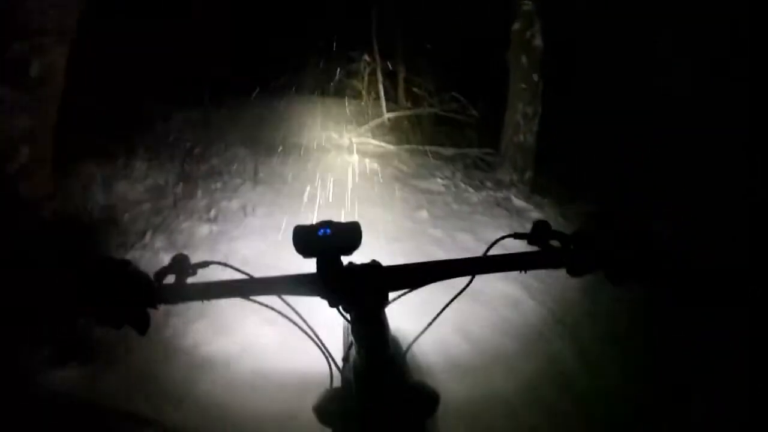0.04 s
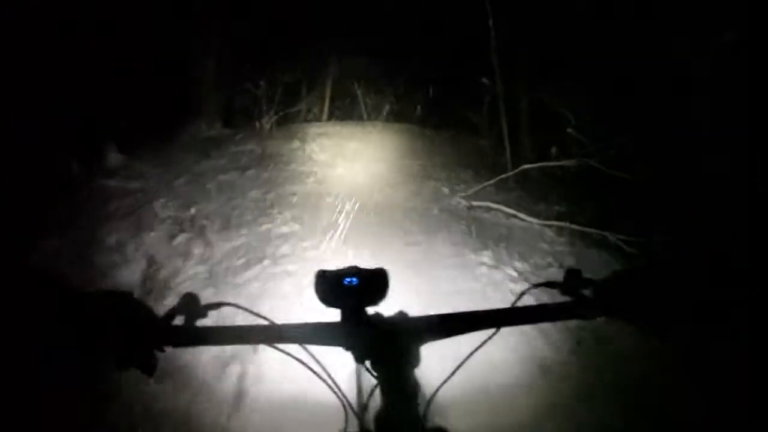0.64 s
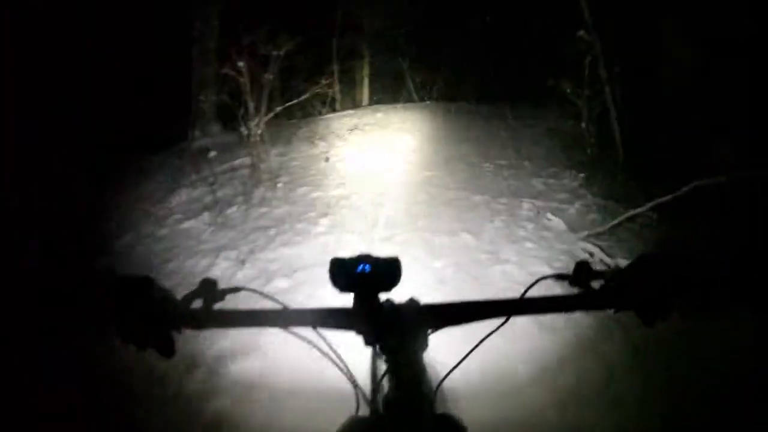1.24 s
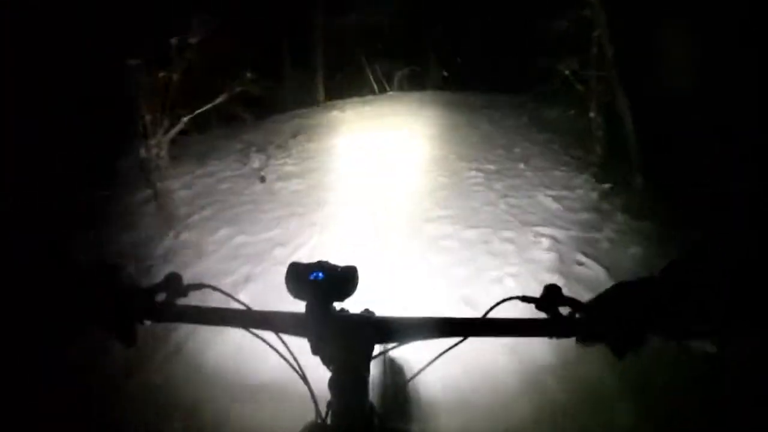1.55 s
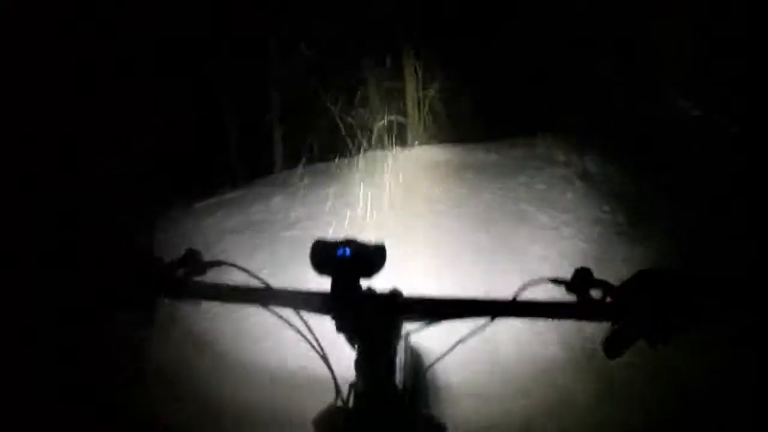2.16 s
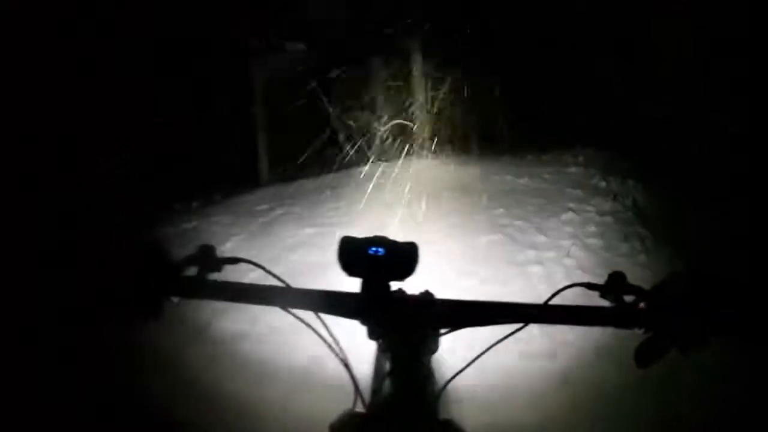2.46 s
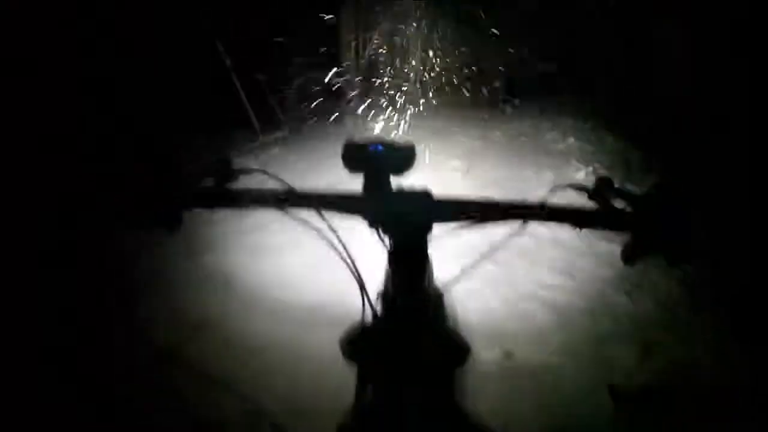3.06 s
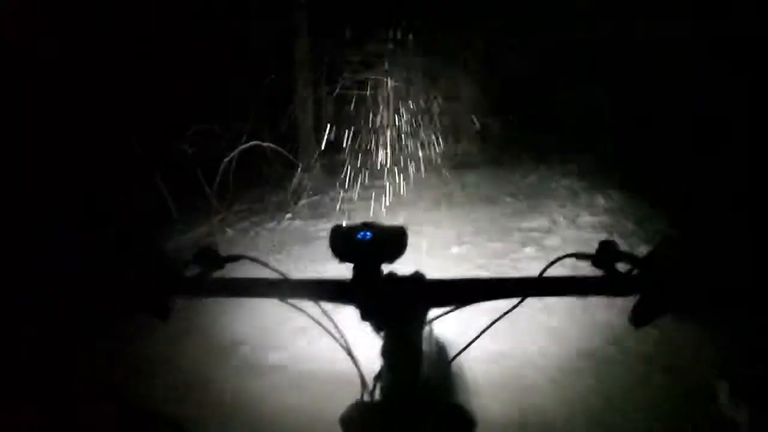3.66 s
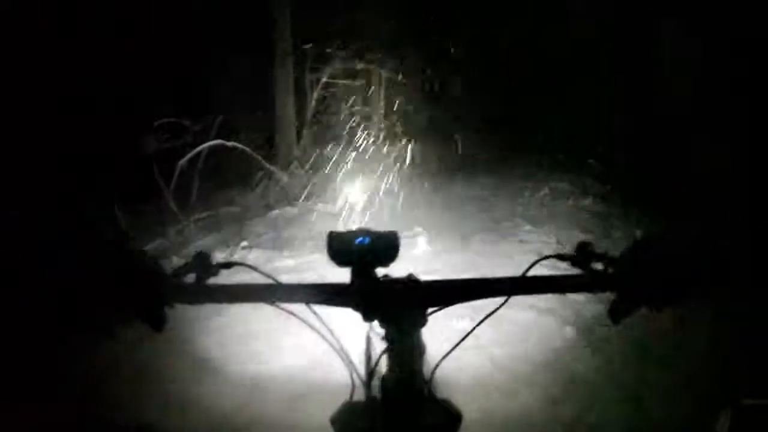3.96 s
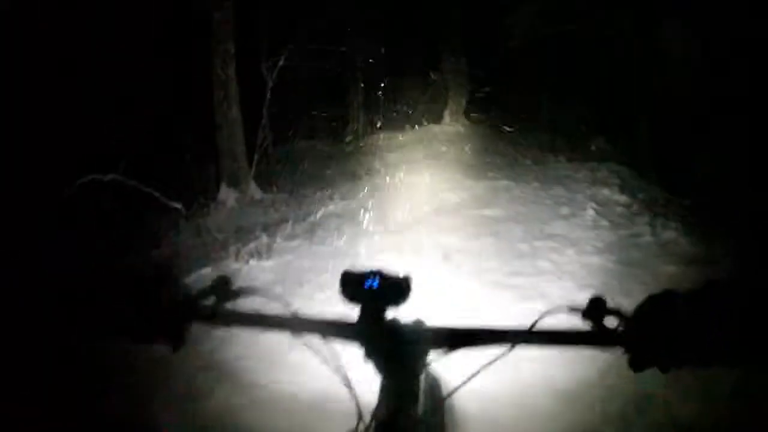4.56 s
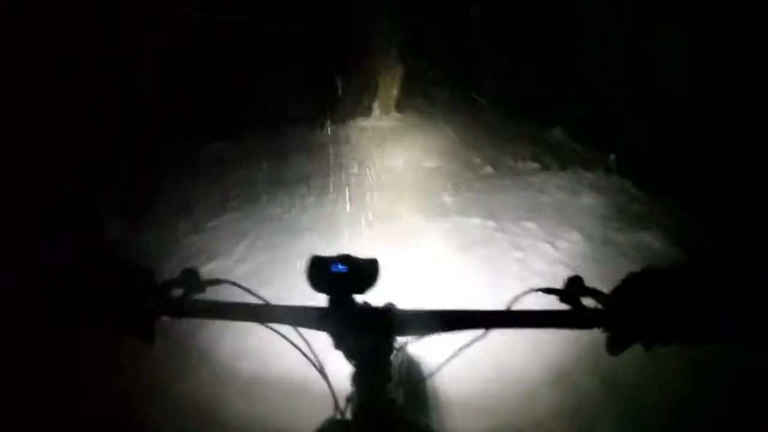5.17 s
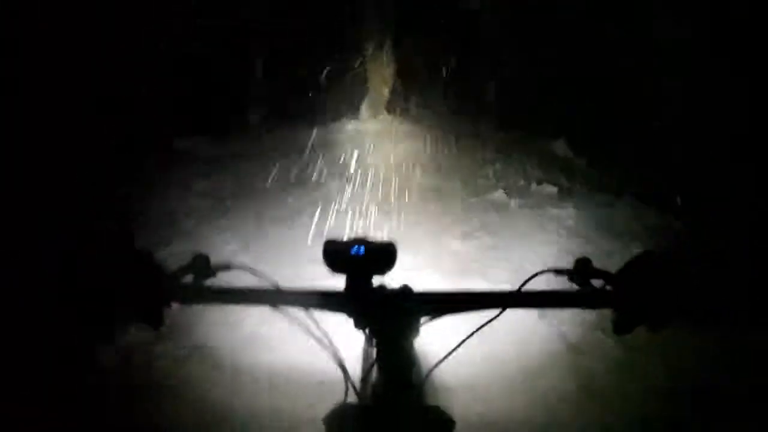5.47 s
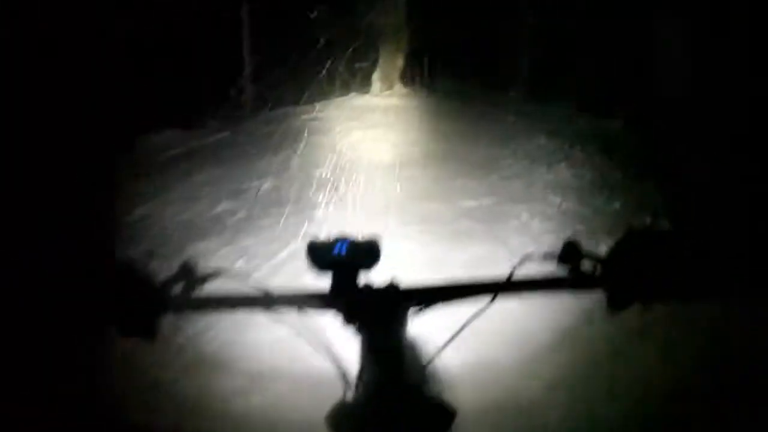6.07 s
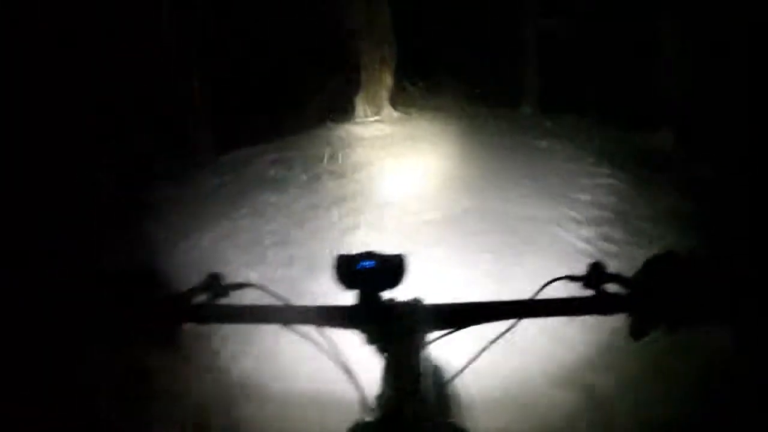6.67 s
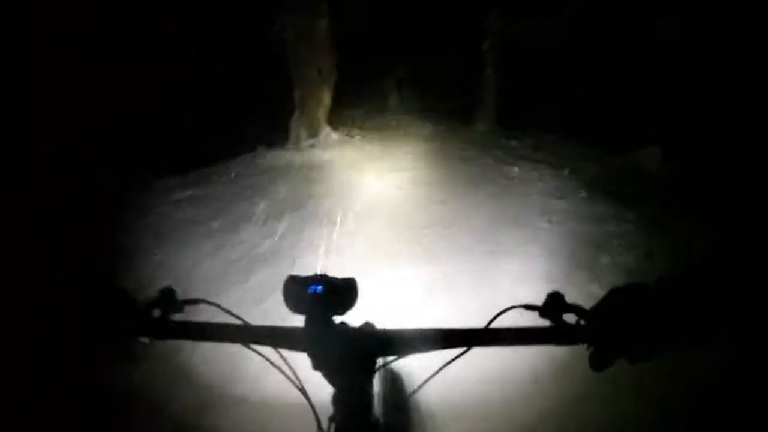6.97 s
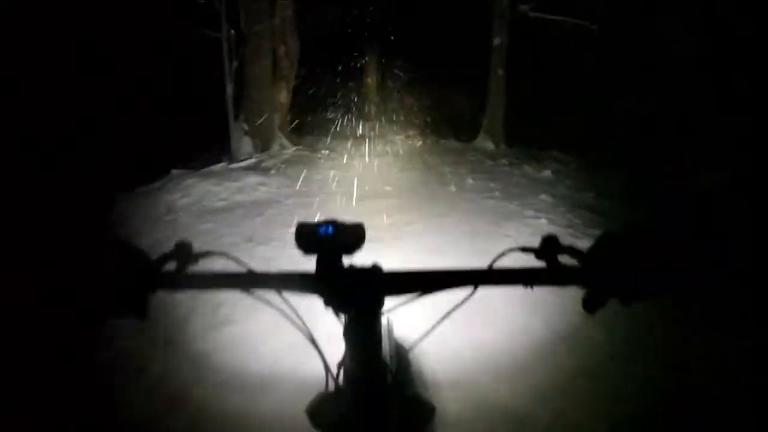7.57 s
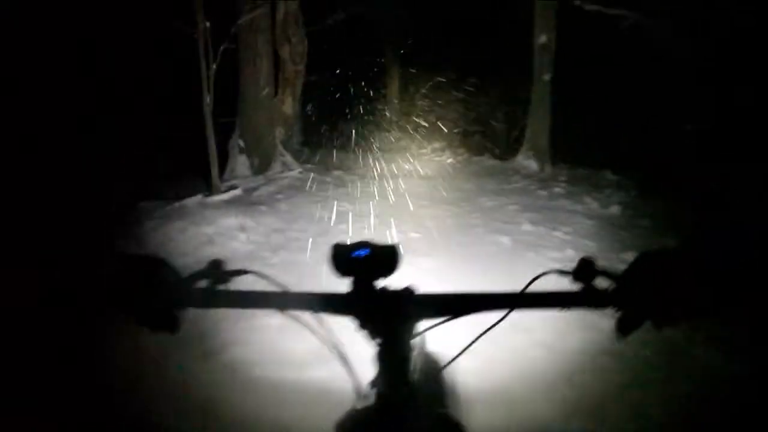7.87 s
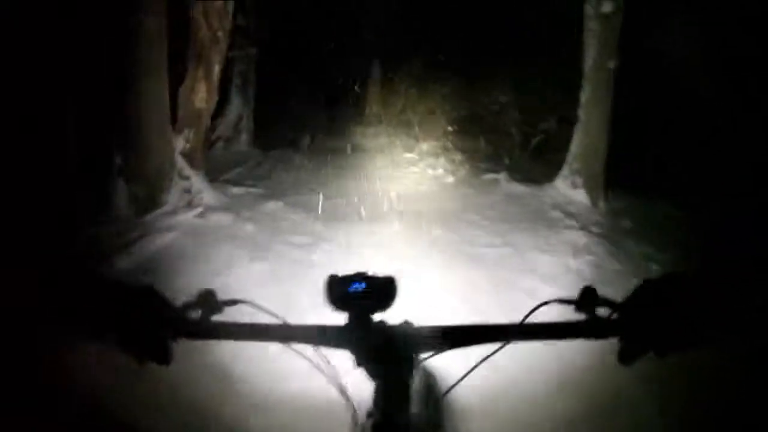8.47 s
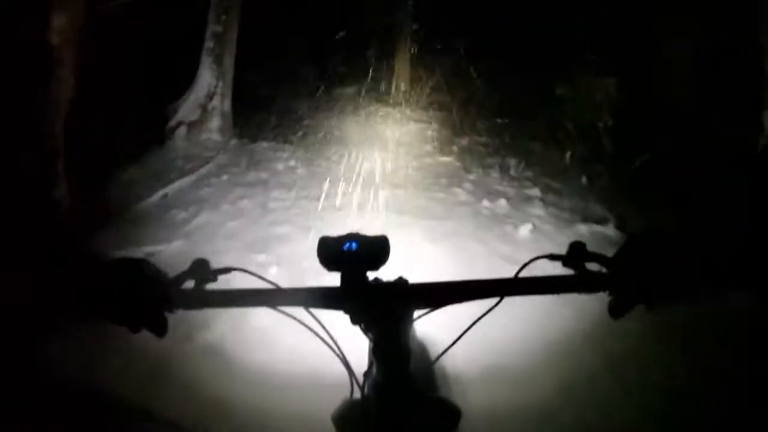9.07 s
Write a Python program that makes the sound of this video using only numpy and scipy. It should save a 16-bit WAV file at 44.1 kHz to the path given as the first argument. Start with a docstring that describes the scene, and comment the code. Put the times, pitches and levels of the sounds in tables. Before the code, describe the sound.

A mountain bike rumbles and crunches over packed snow, with bumps thudding and loose parts clacking sharply right at the microphone.

```python
"""Mountain bike on packed snow.

On the trail, from a cased camera worn by the rider, the tyres just below. They rumble and crunch,
going light before each bump and loading up after it. Bumps thud through the mount; loose parts knock
and clack against it, right at the microphone. The ringing plastic housing colours the snow and the
contacts, and the hardest clacks overload the microphone."""
import sys
import numpy as np
from scipy import signal
from scipy.fft import rfft, irfft
from scipy.io import wavfile

SR = 44100
rng = np.random.default_rng(int(sys.argv[2]) if len(sys.argv) > 2 else 0)


def generate_wav(sig):
    """Save sig (samples, or channels by samples) to the path in sys.argv[1] as 16-bit PCM at SR."""
    pcm = np.round(np.clip(np.atleast_2d(sig).T, -1, 1) * 32767).astype(np.int16)
    wavfile.write(sys.argv[1], SR, pcm)


N = 411012


def gain_of(db):
    """Decibels to amplitude."""
    return 10 ** (np.asarray(db) / 20)


def unit_rms(x):
    """Scales to rms 1."""
    return x / np.sqrt(np.mean(x ** 2) + 1e-20)


def add(mix, s, sound, db):
    """Mixes in a short sound at time s, with the energy of 10 ms at rms level db."""
    sound = gain_of(db) * sound / np.sqrt(np.sum(sound ** 2) / (SR / 100) + 1e-20)
    part = mix[max(round(s * SR), 0):][:len(sound)]
    part += sound[:len(part)]


def wander(rate_hz):
    """Smooth random drift of rms 1, rolled off above the rate."""
    hz = np.fft.rfftfreq(N, 1 / SR)
    return unit_rms(irfft(rfft(rng.standard_normal(N)) / (1 + (hz / rate_hz) ** 4), N))


def band(x, low_hz, high_hz, order=2):
    """Causal band-pass."""
    return signal.sosfilt(signal.butter(order, [low_hz, high_hz], "band", fs=SR, output="sos"), x)


# Resonances of the plastic housing around the microphone: f/Hz, width/Hz, relative level/dB
CASE_RESONANCES = [(750, 190, -7.0), (940, 210, 0.0), (1090, 170, -4.5), (1360, 210, -13.0),
                   (1740, 460, -3.0), (2100, 570, -3.5), (2710, 550, -18.0), (3420, 730, -10.5),
                   (3590, 90, -16.5), (4550, 670, -16.5), (5360, 480, -22.5), (7310, 1350, -22.0),
                   (8540, 660, -17.5), (9970, 1010, -16.5), (11030, 240, -20.5), (12970, 270, -22.0),
                   (14000, 920, -18.5), (15240, 330, -27.5)]
def housing(tilt_db, leak_db, size=4096):
    """Impulse response of the case: its resonances over a flat leak, tilted by tilt_db an octave."""
    hz = abs(np.fft.fftfreq(size, 1 / SR))
    power = sum(gain_of(db) ** 2 / (1 + (2 * (hz - f) / width) ** 2) ** 2
                for f, width, db in CASE_RESONANCES)
    tilt = gain_of(tilt_db * np.log2(1 + hz / 1000))
    log_gain = np.log(np.sqrt(power + gain_of(leak_db) ** 2) * tilt)
    minimum_phase = np.exp(np.conj(signal.hilbert(log_gain)))
    return np.fft.ifft(minimum_phase).real[:size // 2]


def chatter(contact_s, tail_s, tail_db, size):
    """Force of a rough contact: a burst, plus a buzz as the part settles."""
    t = np.arange(size) / SR
    return rng.standard_normal(size) * (np.exp(-t / contact_s) + gain_of(tail_db) * np.exp(-t / tail_s))


def scrape(case, band_hz, contact_s, tail_s, tail_db, size=3072):
    """A rough contact heard through one band of the case."""
    force = chatter(contact_s, tail_s, tail_db, size)
    return unit_rms(band(signal.fftconvolve(force, case)[:size], *band_hz, order=3))


def ring(modes, rise_cycles, detune, size=3072):
    """Struck modes build up and die away; each blow varies their pitch and level a little."""
    t, chance = np.arange(size) / SR, rng.standard_normal((len(modes), 2))
    out = np.zeros(size)
    for (hz, db, t60), (sharper, louder) in zip(modes, chance):
        envelope = gain_of(db + 1.25 * louder - 60 * t / t60) * (1 - np.exp(-t * hz / rise_cycles))
        out += envelope * np.sin(2 * np.pi * hz * (1 + detune * sharper) * t)
    return out


# Steady rolling between bumps, before each layer's trim: t/s, rumble level/dB, snow level/dB
ROLLING = [(0.0, -45, -50.5), (1.04, -49.5, -55.5), (1.3, -48.5, -52.5), (2.59, -48.5, -53.5),
           (3.01, -44, -48.5), (3.97, -52, -57), (4.13, -49.5, -53), (5.73, -48.5, -53.5), (6.13, -47, -49),
           (7.01, -49, -57.5), (7.5, -51, -52), (7.76, -47, -51), (8.25, -47.5, -51.5), (9.32, -50, -53.5)]
# Patches where the tyre breaks through the crust: t/s, length/s, level/dB before trim
CRUST_PATCHES = [(0.033, 0.16, -49), (0.379, .1, -48), (1.252, 0.073, -47.5), (1.42, 0.056, -50.5),
                 (1.773, 0.041, -40), (1.823, .1, -48), (2.046, 0.034, -43), (2.614, 0.092, -51),
                 (3.095, 0.042, -35), (3.58, 0.098, -49), (3.89, 0.077, -46.5), (4.093, 0.061, -49.5),
                 (4.474, 0.093, -54), (4.74, 0.032, -45.5), (4.99, 0.11, -51.5), (5.913, 0.24, -46.5),
                 (6.006, 0.05, -39.5), (6.355, 0.18, -48.5), (6.664, 0.13, -49.5), (7.041, 0.048, -50.5),
                 (7.232, 0.14, -51), (7.602, .22, -47.5), (7.92, 0.15, -48), (8.245, 0.088, -47.5),
                 (8.56, 0.048, -46), (8.738, 0.051, -47), (8.913, 0.013, -62), (9.293, 0.023, -49.5)]
def tyre_load(layer, roll_trim_db, bump_db, bump_follows, crust_trim_db):
    """A layer's level in dB over time: rolling, a lull before each jolt, swells at bumps and crust."""
    lull_lead_s, lull_width_s, lull_db = 0.062, 0.034, -1.5
    rise_s, settle_s, crust_edge_s = 0.017, 0.042, 0.015
    t = np.linspace(0, N / SR, N // 100)
    times, rumble_db, snow_db = np.transpose(ROLLING)
    roll_db = roll_trim_db + np.interp(t, times, {"rumble": rumble_db, "snow": snow_db}[layer])
    lulls = [np.exp(-((t - s + lull_lead_s) / lull_width_s) ** 2) for s, _, _ in jolts()]
    power = gain_of(roll_db + lull_db * np.max(lulls, axis=0)) ** 2
    typical_db = np.median([db for _, db, _ in BUMPS])
    for s, db, _ in BUMPS:
        swell = np.exp(-np.maximum((s - t) / rise_s, (t - s) / settle_s))
        power += (swell * gain_of(bump_db + bump_follows * (db - typical_db))) ** 2
    for s, length, db in CRUST_PATCHES:
        inside = (1 + np.tanh(np.minimum(t - s, s + length - t) / crust_edge_s)) / 2
        power += inside * gain_of(crust_trim_db + db) ** 2
    return np.interp(np.arange(N) / SR, t, 10 * np.log10(power))


# Spectrum of tyres and wind at the camera: f/Hz, relative level/dB
RUMBLE_SPECTRUM = [(10, -7), (25, 2.5), (45, 2), (80, -1), (125, 3.5), (190, -7.5), (280, -7.5), (400, -15),
                   (560, -25), (900, -76), (2000, -56)]
def rumble(lumpy_db=2, kicks_db=-7, kicks_per_s=45, spread_db=5.5):
    """Tyres and air shake the camera: a low roar, and small kicks that arrive one by one."""
    f, db = np.transpose(RUMBLE_SPECTRUM)
    hz = np.fft.rfftfreq(N, 1 / SR)
    spectrum = gain_of(np.interp(np.log(hz + 1), np.log(f), db))
    roar = irfft(rfft(rng.standard_normal(N)) * spectrum, N)
    sizes = gain_of(spread_db * np.minimum(rng.exponential(1, N), 3))
    kicks = band(sizes * (rng.random(N) < kicks_per_s / SR), 83, 235)
    shake = unit_rms(roar * gain_of(lumpy_db * wander(30))) + gain_of(kicks_db) * unit_rms(kicks)
    load_db = tyre_load("rumble", roll_trim_db=-0.5, bump_db=-41, bump_follows=0.17, crust_trim_db=-0.5)
    return unit_rms(shake) * gain_of(load_db)


def snow_load():
    """Level of the snow in dB over time: it sounds mostly where the crust breaks."""
    return tyre_load("snow", roll_trim_db=0.94, bump_db=-50, bump_follows=0.95, crust_trim_db=0.5)


def fractures(per_s, spread_db, max_spreads):
    """Snow grains snap at random: sparse impulses of either sign and uneven size."""
    sizes = gain_of(spread_db * np.minimum(rng.exponential(1, N), max_spreads))
    return sizes * rng.choice([-1, 1], N) * (rng.random(N) < per_s / SR)


def snow_crunch(hiss=0.98, split_hz=3000, clump_db=2.0, powder_db=-1, patchy_db=2.5):
    """Below the rider, tyre knobs crush the snow: coarse clumps of fractures and a finer powder hiss."""
    load_db = snow_load()
    grains = unit_rms(fractures(per_s=1100, spread_db=1.0, max_spreads=5))
    force = grains + hiss * rng.standard_normal(N)
    crush = unit_rms(signal.oaconvolve(force, housing(0, -34))[:N])
    coarse = signal.sosfiltfilt(signal.butter(3, split_hz, fs=SR, output="sos"), crush)
    held_back_db = 0.33 * (load_db - load_db.mean())  # powder swells less under load than crust does
    powder = (crush - coarse) * gain_of(powder_db + patchy_db * wander(100) - held_back_db)
    return (coarse * gain_of(clump_db * wander(44)) + powder) * gain_of(load_db)


def crystal_sizzle(trim_db=-17, follows=0.66, band_hz=(3250, 5600)):
    """Fine crystals snap under the knobs, a crisp colour that rises with the load."""
    load_db = snow_load()
    grains = fractures(per_s=700, spread_db=3.0, max_spreads=4)
    sizzle = band(signal.oaconvolve(grains, housing(1, -37))[:N], *band_hz, order=3)
    return unit_rms(sizzle) * gain_of(trim_db + load_db.mean() + follows * (load_db - load_db.mean()))


def crust_crackles(per_s=12, spread_db=4, pellet_share=0.35, pellet_db=-5, count=130):
    """Bits of crust pop under the tyres, louder under load; flung pellets tick more brightly."""
    out, case, load_db = np.zeros(N), housing(0, -69), snow_load()
    times = np.cumsum(rng.exponential(1 / per_s, count))
    for s, (strength, kind) in zip(times, rng.random((count, 2))):
        db = load_db[min(round(s * SR), N - 1)] + spread_db * (2 * strength - 1)
        if kind < pellet_share:
            add(out, s, scrape(case, (2840, 9200), 0.00061, 0.0079, -14), db + pellet_db)
        else:
            add(out, s, scrape(case, (1060, 5800), 0.0019, 0.005, -19), db)
    return out


# Chain, cables and grit, down on the bike: t/s, level/dB
BIKE_TICKS = [(0.319, -48.5), (0.5954, -54), (0.8065, -41.5), (1.5081, -54), (2.4215, -53), (2.864, -49),
              (3.316, -46), (4, -46), (5.078, -48.5), (6.2657, -46), (9.1232, -49)]
def bike_ticks(band_hz=(2960, 9100)):
    """Small hard contacts excite only the upper resonances of the case."""
    out, case = np.zeros(N), housing(-1.2, -35)
    for s, db in BIKE_TICKS:
        force = chatter(contact_s=0.00074, tail_s=0.004, tail_db=-2, size=2048)
        add(out, s, band(signal.fftconvolve(force, case), *band_hz), db)
    return out


def jolts(recoil_db=-30.5, recoil_growth=0.2, recoil_hz=192.4):
    """Ground bumps and the mount's recoil from every clack, as rows of t/s, level/dB, f/Hz."""
    recoils = [(s, recoil_db + recoil_growth * (db - HARDEST_DB), recoil_hz)
               for s, db, _, _ in CASE_CLACKS]
    return list(BUMPS) + recoils


# Bumps in the trail, reaching the microphone through the mount: t/s, level/dB, f/Hz
BUMPS = [(0.044, -35.5, 104), (0.427, -31, 176), (1.14, -40, 80), (1.386, -31.5, 128), (1.714, -34.5, 162),
         (1.783, -26, 128), (1.819, -36, 119), (2.09, -29.5, 149), (2.704, -27, 200), (2.87, -38, 130),
         (3.1, -27.5, 168), (3.173, -34.5, 133), (3.22, -36, 121), (3.373, -29.5, 134), (3.716, -34.5, 203),
         (3.94, -31, 123), (4.054, -33, 125), (4.649, -27, 117), (5.131, -37, 45), (5.278, -41, 95),
         (5.999, -24.5, 128), (6.092, -29, 118), (6.362, -15, 114), (6.398, -25.5, 145), (6.73, -38, 121),
         (6.82, -38.5, 121), (7.575, -35.5, 160), (7.607, -34, 176), (7.782, -30, 142), (7.927, -29.5, 115),
         (8.25, -42, 120), (8.906, -28.5, 85), (8.93, -31.5, 119), (9.283, -31, 124)]
def mount_thuds(rise_s=0.0013, decay_cycles=0.49, crush_db=-12, crush_limit_db=-38):
    """Each jolt swings the mount for a cycle or two and crushes a patch of snow."""
    out, t, case = np.zeros(N), np.arange(4096) / SR, housing(-1.1, -36)
    for s, db, hz in jolts():
        envelope = (1 - np.exp(-t / rise_s)) * np.exp(-t * hz / decay_cycles)
        add(out, s, envelope * np.sin(2 * np.pi * hz * t), db)
        crush = scrape(case, (730, 2900), 0.0067, 0.018, -30)
        add(out, s, crush, min(db + crush_db, crush_limit_db))
    return out


def clack(hz, case, softness, size=3072):
    """A hard contact a few cycles long, with a short buzz; a softer one lingers and buzzes more."""
    t, swell_s = np.arange(size) / SR, 0.0005 * softness ** 0.45
    body = (t / swell_s) ** 2 * np.exp(-t / swell_s) * np.sin(2 * np.pi * hz * t)
    buzz = scrape(case, (1530, 3150), 0.005, 0.0044, -18)
    return unit_rms(body) + gain_of(-10 + 9 * np.log10(softness)) * buzz


# Ringing modes of a hollow knock: f/Hz, relative level/dB, t60/s
HOLLOW_MODES = [(816, -7.5, 0.029), (935, 2, 0.031), (1072, -6.5, 0.034)]
# Damped modes of a flat, dry slap: f/Hz, relative level/dB, t60/s
SLAP_MODES = [(1130, -2, .014), (1250, 0, .016), (1400, -1, .014)]
# Damped modes of the whole case flexing: f/Hz, relative level/dB, t60/s
FLEX_MODES = [(480, 1, .007), (640, 3, .009), (2680, -1, .012), (3250, -2, .011)]
def add_blow(out, s, hollow_db, slap_db, clack_db, clack_hz, edge_db, graze_lead_s=0.004):
    """One blow at the microphone: a hollow knock, a dry slap, a clack and a bright edge from the case."""
    case, bright_case = housing(0, -58), housing(3.4, -76)
    force_db = max(clack_db, hollow_db - 4)
    softness = 10 ** ((HARDEST_DB - force_db) / 40)  # softer blows stay in contact longer
    add(out, s, ring(HOLLOW_MODES, rise_cycles=1.35, detune=0.041), hollow_db)
    add(out, s, ring(SLAP_MODES, rise_cycles=0.2, detune=0.02), slap_db)
    add(out, s, clack(clack_hz, case, softness), clack_db)
    add(out, s, scrape(case, (5260, 11300), 0.00098, 0.0035, -28), edge_db)
    # a harder clack flexes the whole case, so it gets fuller as well as louder
    flex_db = clack_db - 5 + 0.82 * (clack_db - HARDEST_DB)
    add(out, s, ring(FLEX_MODES, rise_cycles=0.83, detune=0.07), flex_db)
    # the thin walls add a crisp top
    add(out, s, scrape(bright_case, (9400, 17000), 0.0011 * softness, 0.0055, -18), force_db - 10)
    # the part grazes just before it lands and chatters on afterwards
    add(out, s - graze_lead_s, scrape(case, (490, 2730), 0.01, 0.0083, 4), min(hollow_db, -21) - 12)


# Ringing modes of a knock's metallic bite: f/Hz, relative level/dB, t60/s
BITE_MODES = [(2360, -5, .02), (3555, 4.5, 0.018), (8480, -10, 0.029), (10160, -8, 0.034)]
def metallic_bites():
    """A knock that lands on a hard spot rings a few higher modes as well."""
    out = np.zeros(N)
    for s, db, _, bite_db in LOOSE_KNOCKS:
        add(out, s, ring(BITE_MODES, rise_cycles=0.86, detune=0.008), db + bite_db)
    return out


# Loose parts on the mount, close up: t/s, level/dB, clack/dB and bite/dB relative to the knock
LOOSE_KNOCKS = [(0.0491, -40.5, -16, -27), (0.1284, -41, 0.5, -8), (0.1577, -36.5, -1, -29),
                (0.4044, -37.5, -15, -6.5), (0.4291, -24.5, -3.5, -7), (0.4483, -34, -0.5, -12),
                (0.4667, -37.5, -1, -14), (0.639, -39.5, -17, -29), (0.897, -49, 2, -12),
                (1.2457, -44, 0, -1), (1.3874, -43.5, -1.5, -6), (2.081, -40.5, -0.5, -25),
                (2.705, -24.5, -10.5, -20), (3.1016, -24.5, -0.5, -7), (3.1075, -16, -5, -8.5),
                (3.398, -28.5, 6.5, -5), (3.7148, -26, -12, -15.5), (3.9187, -40, 1, -12),
                (3.9887, -37, -8, -31), (4.054, -45, 1, -8), (4.6496, -37.5, -3.5, -20),
                (4.8929, -38, -4.5, -9), (5.5002, -45.5, 0, -17), (6.3642, -22.5, -3.5, -19),
                (7.2726, -42.5, -5.5, -22), (7.509, -49, 2.5, -1), (8.2718, -58, -2, 9.5),
                (8.911, -47.5, 6.5, -16)]
def loose_knocks():
    """Loose parts knock hollowly against the mount, each with some clack in it."""
    out = np.zeros(N)
    for s, db, clack_db, bite_db in LOOSE_KNOCKS:
        add_blow(out, s, hollow_db=db, slap_db=db - 13, clack_db=db + clack_db, clack_hz=2200,
                 edge_db=db + bite_db - 5)
    return out


# Hard parts on the case, right at the microphone: t/s, level/dB, f/Hz, slap/dB relative to the clack
CASE_CLACKS = [(0.2388, -28.5, 1750, -3.5), (0.2983, -40.5, 1800, 0.5), (1.3088, -30, 1940, -21),
               (1.7811, -34, 1910, -6), (2.3247, -44.5, 1660, -12), (2.9455, -38.5, 1710, -14),
               (3.0203, -9, 1900, -2.5), (4.2194, -32.5, 1720, -18), (5.0901, -35, 1800, -17),
               (5.1249, -12, 1830, -4.5), (5.7852, -28.5, 1800, 1.5), (5.9223, -32.5, 1790, -15),
               (6.0055, -35.5, 2030, -12), (6.1791, -9.5, 1777, -2), (6.244, -29, 1800, -20),
               (6.4029, -22, 1670, -3), (6.4973, -30, 1750, 1.5), (6.6704, -28.5, 1750, -20),
               (6.975, -43, 1700, -11), (7.7634, -33, 1800, 6.5), (7.8931, -29.5, 1850, -11),
               (8.2181, -37, 1700, -20), (8.5506, -29.5, 1720, -20), (8.7891, -37.5, 1830, -1.5)]
HARDEST_DB = max(row[1] for row in CASE_CLACKS)
def case_clacks(edge_growth=0.49):
    """Hard parts clack on the case; softer clacks lose their sharp edge first."""
    out = np.zeros(N)
    for s, db, hz, slap_db in CASE_CLACKS:
        add_blow(out, s, hollow_db=db - 8.5, slap_db=db + slap_db, clack_db=db, clack_hz=hz,
                 edge_db=db - 15.5 + edge_growth * (db - HARDEST_DB))
    return out


def scene():
    """Trail, mount and bike meet at the one microphone on the rider."""
    trail = rumble() + snow_crunch() + crystal_sizzle() + crust_crackles()
    contacts = mount_thuds() + loose_knocks() + case_clacks() + metallic_bites() + bike_ticks()
    return (trail + contacts)[None]


def gain_control(x, threshold_db=-23, share=0.36, recover_db_per_s=45, attack_s=0.0037, sense_s=0.009):
    """The camera turns itself down after a loud blow and recovers within a moment."""
    def lag(v, s):
        keep = np.exp(-1 / (s * SR))
        return signal.lfilter([1 - keep], [1, -keep], v)
    level_db = 10 * np.log10(lag(x ** 2, sense_s) + 1e-12)
    cut_db = share * np.maximum(level_db - threshold_db, 0)
    recovery_db = np.arange(N) / SR * recover_db_per_s
    held_db = np.maximum.accumulate(cut_db + recovery_db, axis=-1) - recovery_db
    return x / gain_of(lag(held_db, attack_s))


def record(dry, ceiling=0.85, cutoff_hz=15900):
    """In the camera: gain control, soft overload on the hardest clacks, then a low-pass."""
    ducked = gain_control(dry)
    squashed = ducked / (1 + (ducked / ceiling) ** 4) ** (1 / 4)
    low_pass = signal.firwin(255, cutoff_hz, window=("kaiser", 9), fs=SR)
    return signal.oaconvolve(squashed, low_pass[None], "same")


dry = scene()
out = record(dry)
generate_wav(out)
```